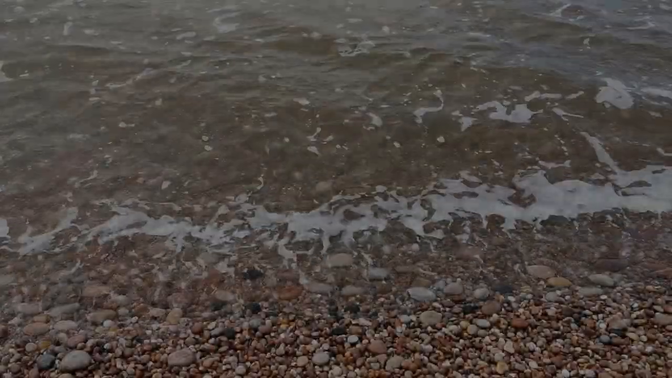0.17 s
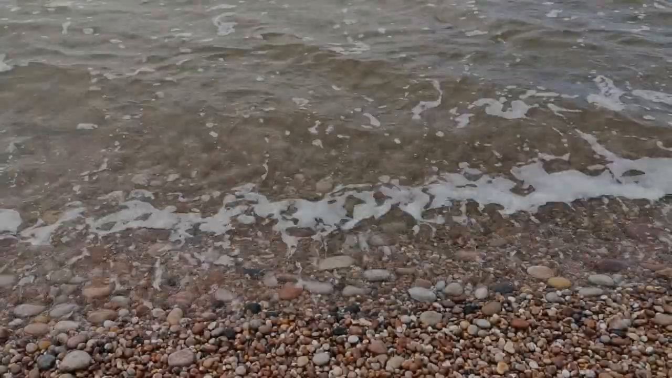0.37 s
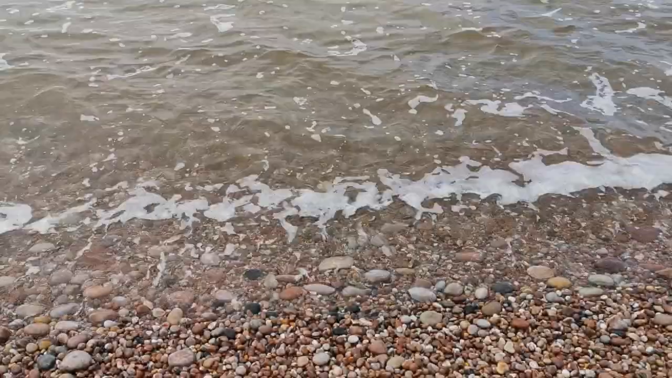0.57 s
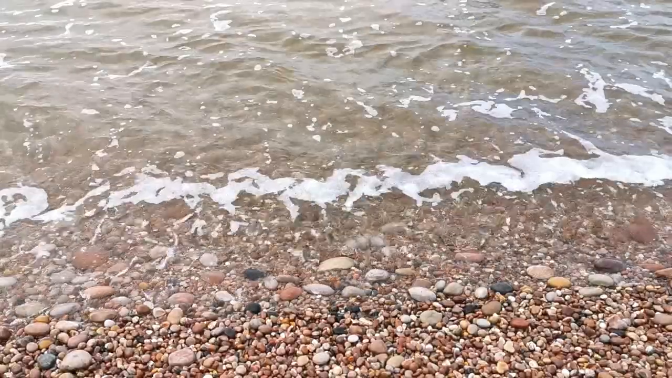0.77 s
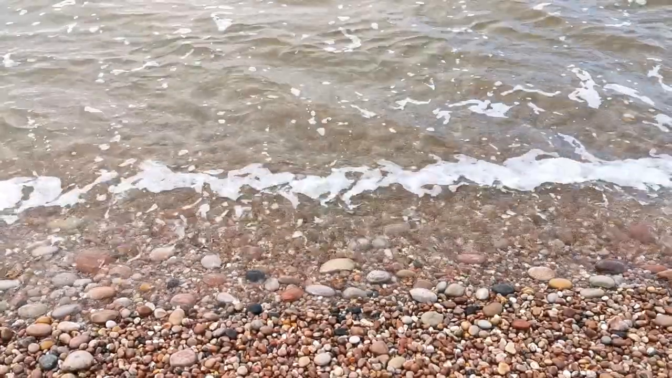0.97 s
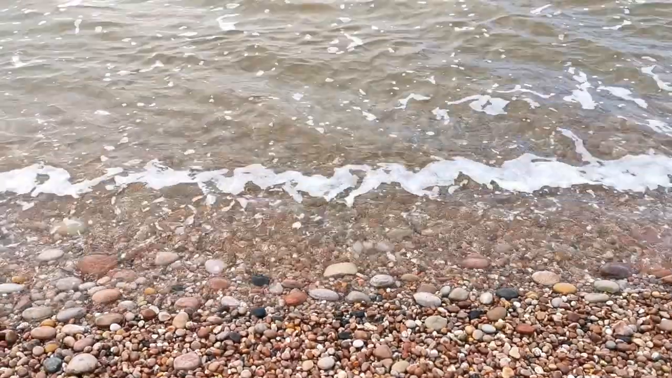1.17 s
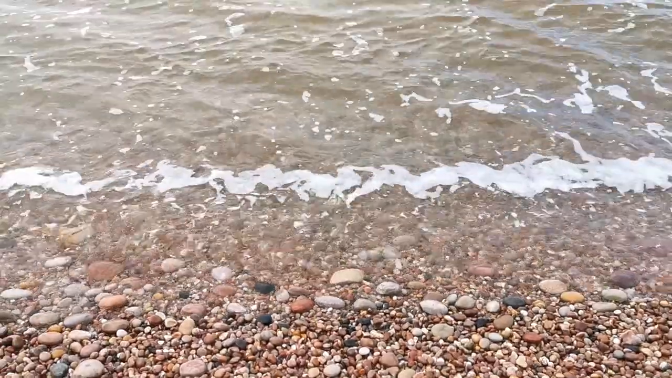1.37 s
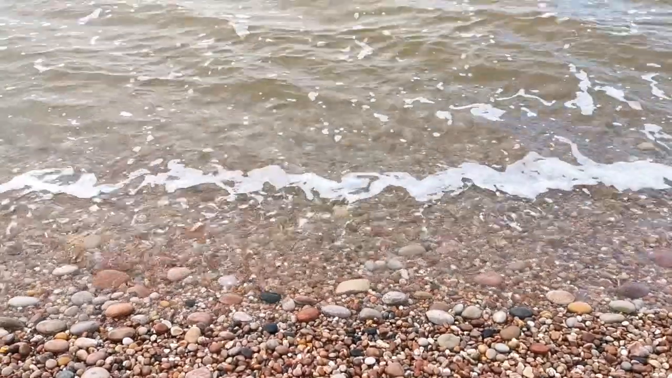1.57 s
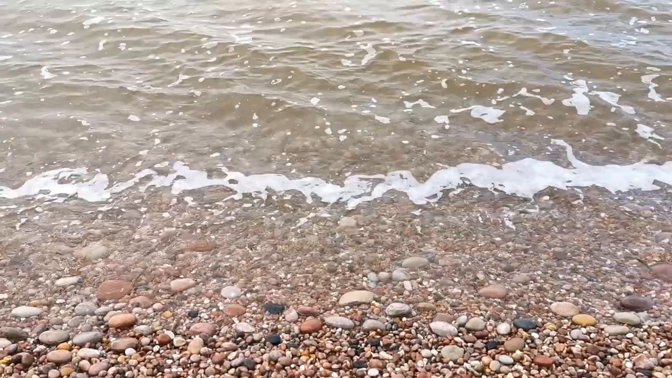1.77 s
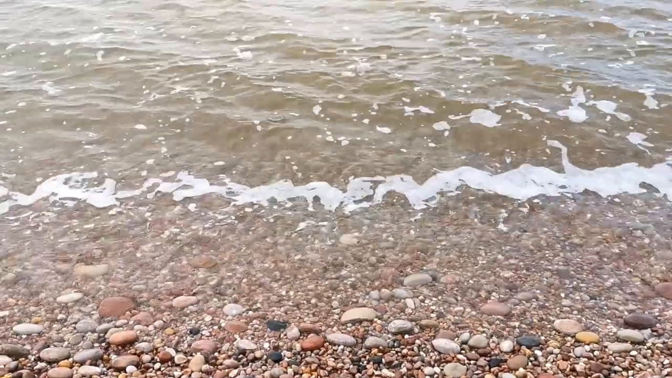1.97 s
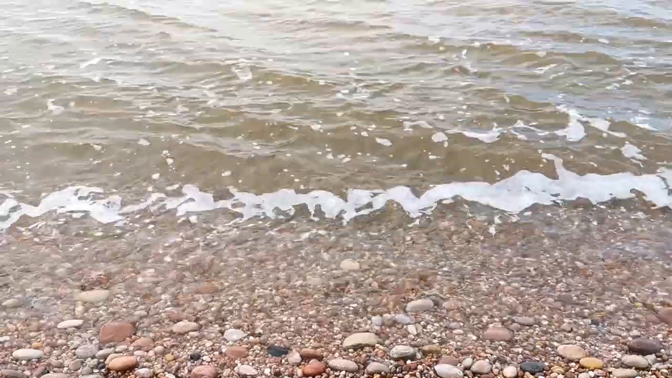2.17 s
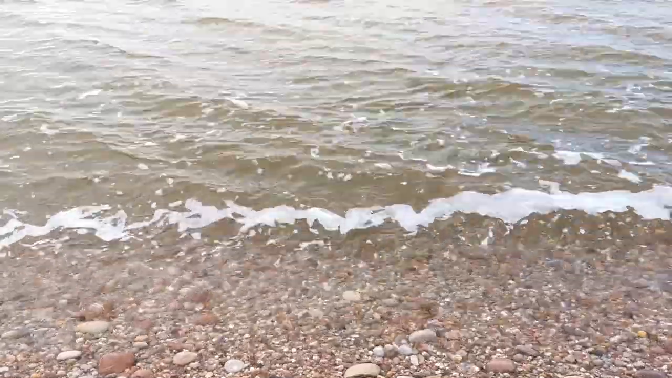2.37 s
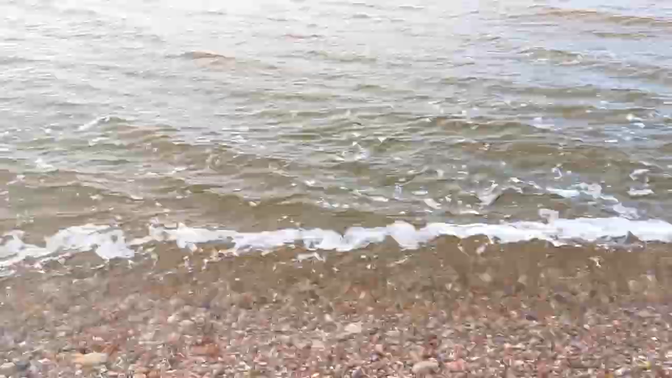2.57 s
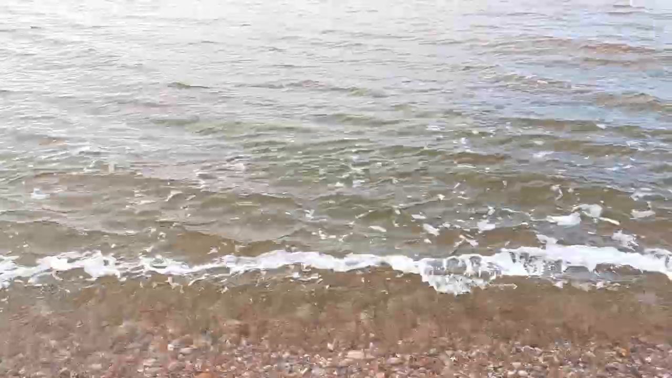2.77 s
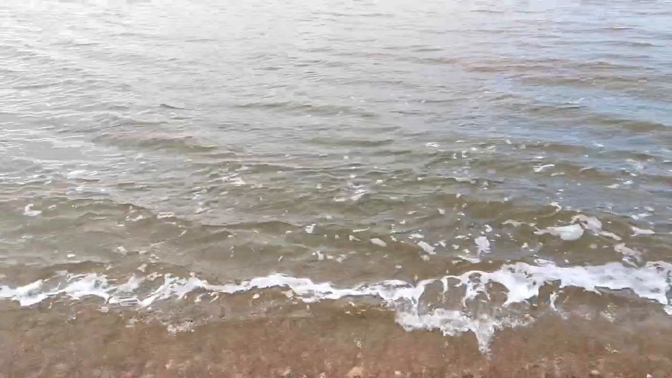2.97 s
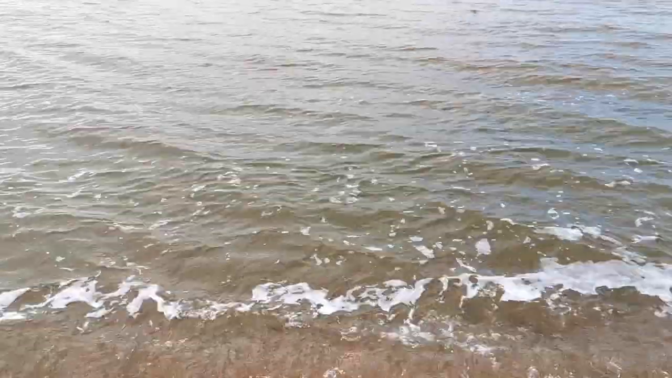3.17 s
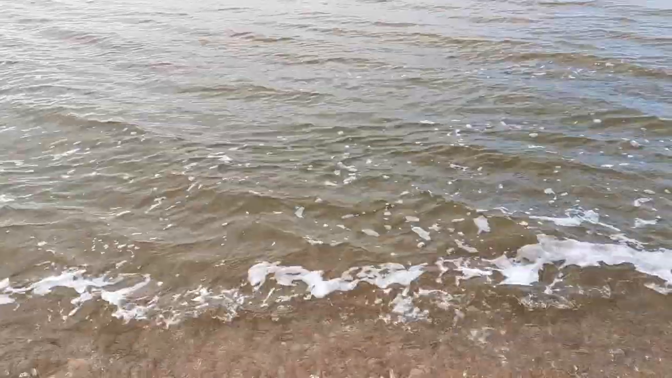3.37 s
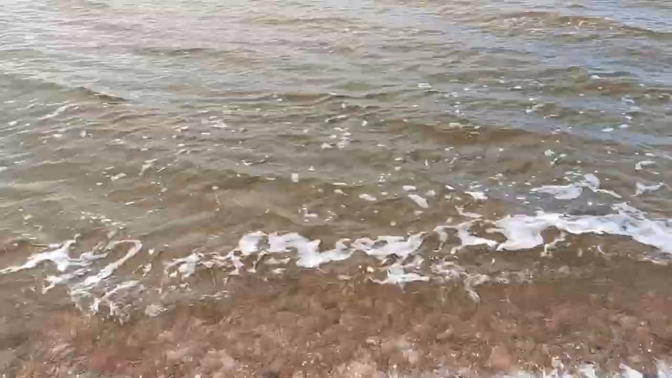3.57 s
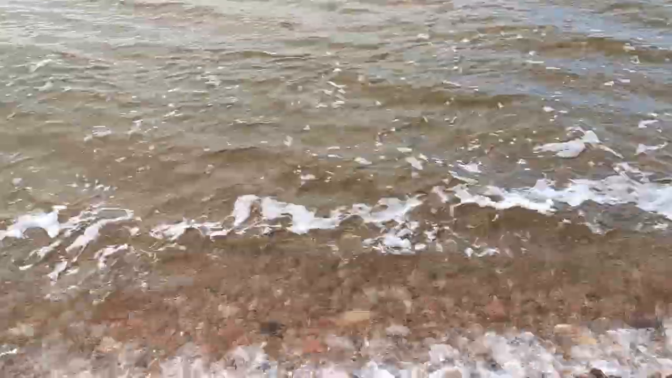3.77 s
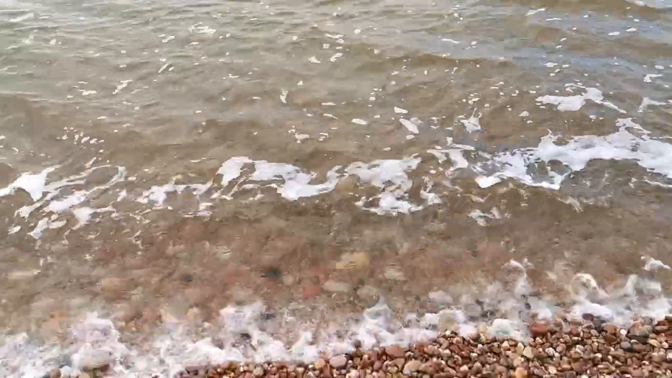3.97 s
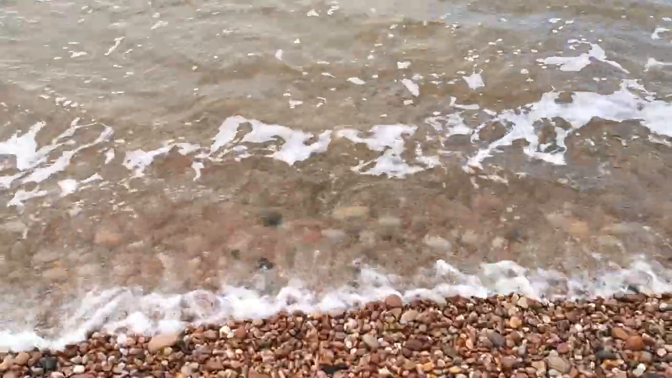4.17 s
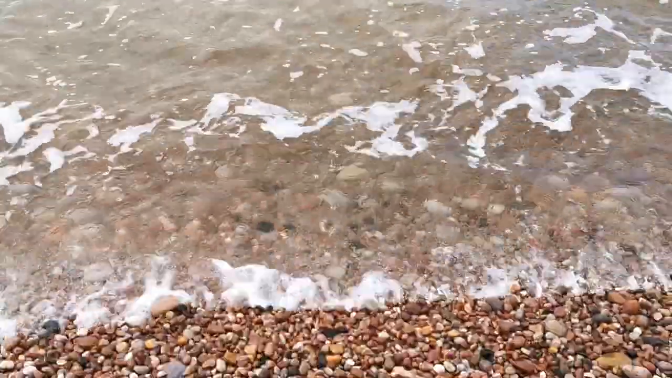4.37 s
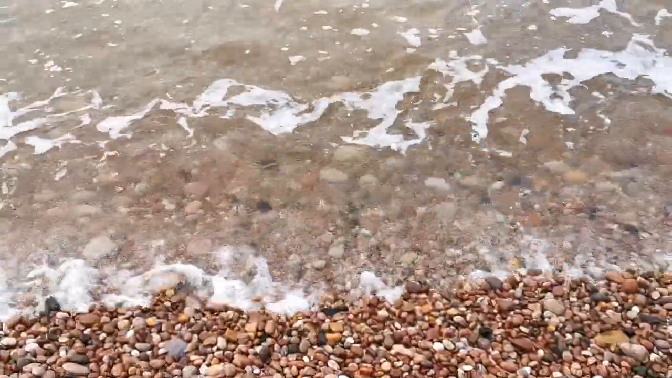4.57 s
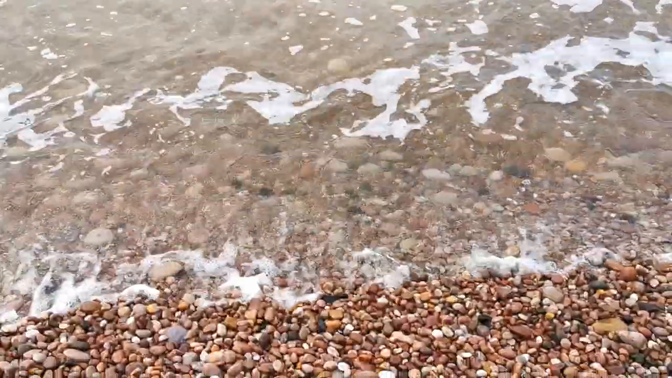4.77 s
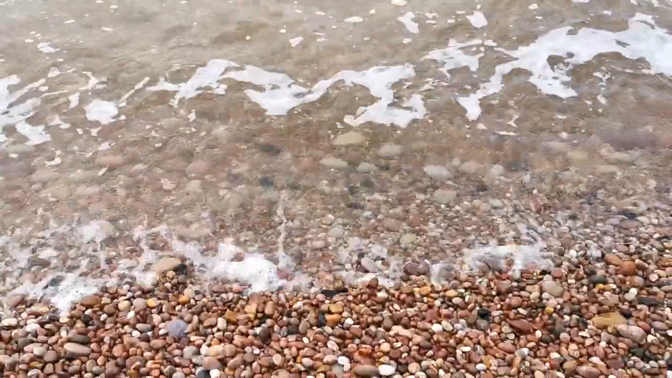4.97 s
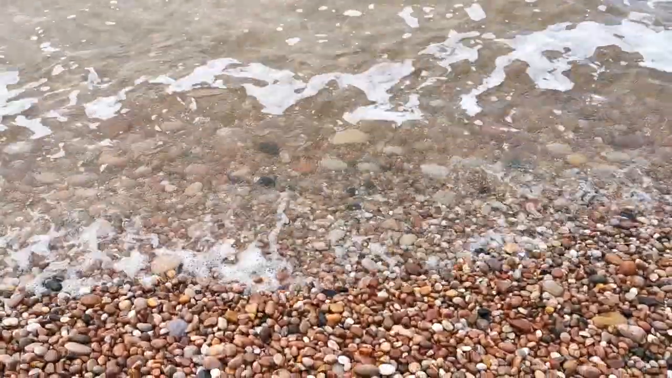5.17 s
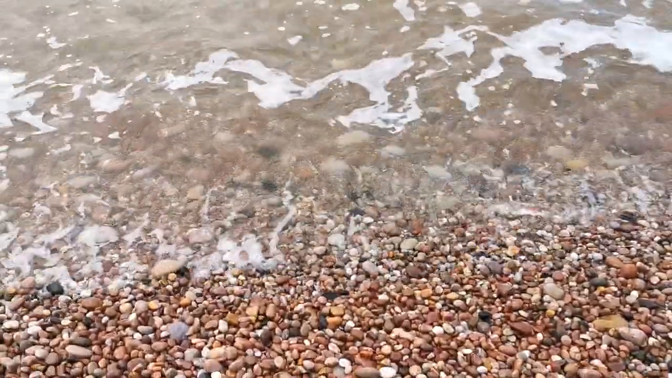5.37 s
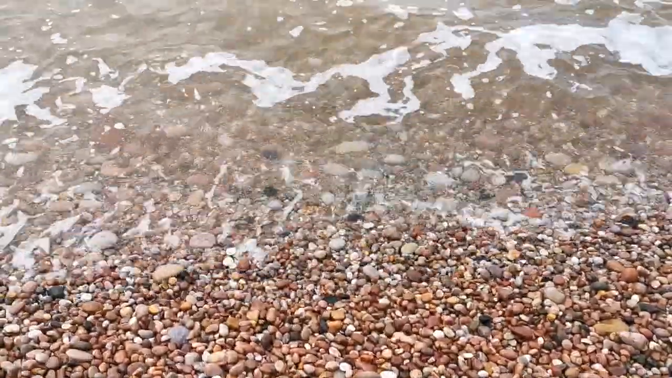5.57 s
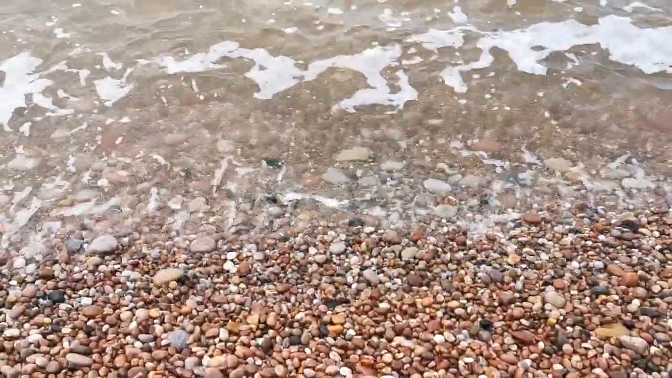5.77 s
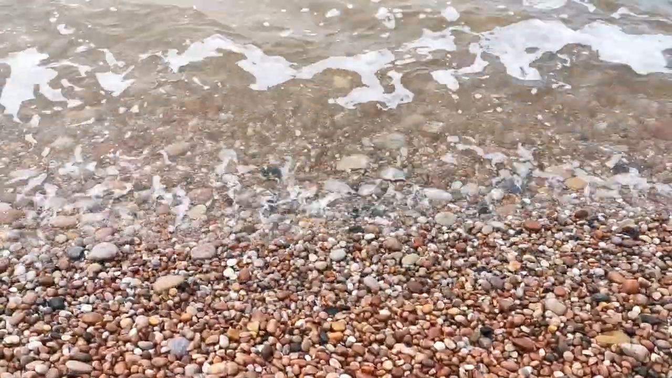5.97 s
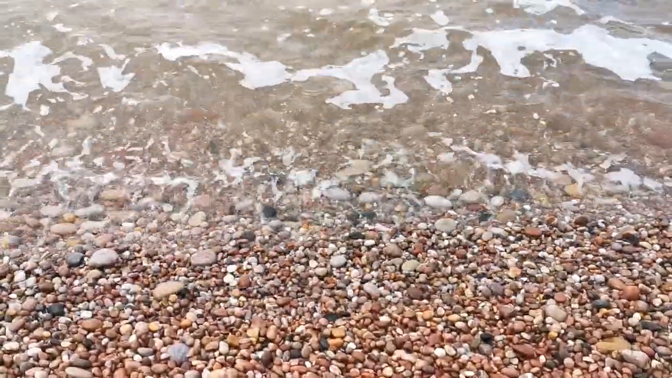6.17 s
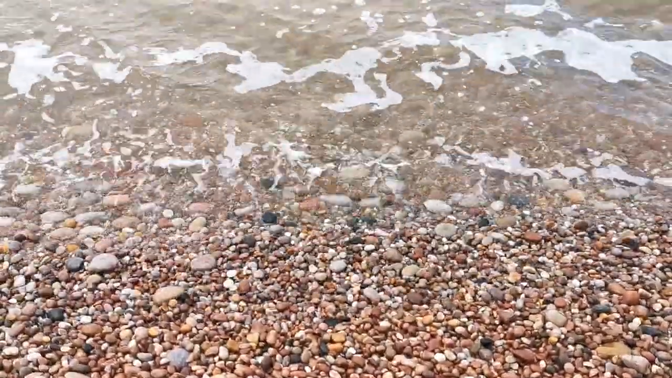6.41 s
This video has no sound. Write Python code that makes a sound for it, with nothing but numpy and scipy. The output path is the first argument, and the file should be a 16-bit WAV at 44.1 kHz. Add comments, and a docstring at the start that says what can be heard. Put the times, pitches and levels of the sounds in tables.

```python
"""A spent wavelet fades on a pebble beach, muffled for half a second; a small lap follows, then a wave plunges,
runs up the shingle and drains back. Two close microphone ports hear it from the water's edge.
Each wash stirs noise and short ringing grains: bubbles, tapping stones and bursting foam. Damped sines make
the single plops, cracks with short rings the pebble knocks, gulps of resonant noise the plunge.
A gusty breeze of low noise buffets the ports, over a faint rumble of far surf."""
import sys
import numpy as np
from scipy import signal
from scipy.fft import rfft, irfft
from scipy.io import wavfile
from scipy.ndimage import uniform_filter1d

SR = 44100
rng = np.random.default_rng(int(sys.argv[2]) if len(sys.argv) > 2 else 0)


def persist_wave(psi):
    """Save psi, clipped to +-1, as 16-bit WAV."""
    counts = np.round(np.clip(psi, -1, 1) * 32767).astype(np.int16)
    wavfile.write(sys.argv[1], SR, np.atleast_2d(counts).T)


N = 283986
TIME, BINS = np.arange(N) / SR, np.fft.rfftfreq(N, 1 / SR)  # seconds, Hz

# Colour of each layer, a relative spectrum per Hz: [freq_hz, level_db]
FAR_SURF_COLOUR = [(60, -9), (110, 0), (160, 9.5), (220, 6), (350, -45), (1000, -43)]
BREEZE_COLOUR = [(10, -14), (30, 2), (70, 0), (105, -8), (150, -9.5), (220, -34.5), (600, -50)]
FOAM_COLOUR = [(1500, -10.5), (3000, 2), (4200, 0.5), (5500, 1), (6300, -2), (7200, 1.5), (7750, -1.5),
               (8300, 2.5), (9100, 1), (10000, -4), (10900, -1), (12000, -8), (14000, -9), (15800, -18)]
SHINGLE_COLOUR = [(900, -7), (1450, 5), (1800, 0), (2450, 1), (2900, 3), (3500, -2), (4300, 1), (5200, -1),
                  (7500, 0), (15000, -50)]
SLOSH_COLOUR = [(400, -3.5), (750, 2), (1000, 3), (1250, 2.5), (1650, -4), (2100, 4), (4000, -44)]
CHURN_COLOUR = [(120, -50), (220, 1), (300, -0.5), (420, 4.5), (520, 1.5), (720, 4), (900, 0.5),
                (1200, 1.5), (2500, -34)]
PLUNGE_COLOUR = [(50, -25), (90, -34), (140, 7), (230, -1), (300, 1), (400, -0.5), (800, -36)]

# Treble dulled at the start: [freq_hz, level_db]
MUFFLING = [(1300, -3), (2500, -7), (4500, -8), (8000, -9.5)]
# Tilt between the ports once the sound has opened out: [freq_hz, left_minus_right_db]
PORT_BALANCE = [(200, -1), (700, 2), (1400, 2), (2400, -2), (3700, -5), (5500, -1), (7300, -4), (8150, 6),
                (8450, 19), (10000, 16), (14000, 15), (15500, 23)]
# How alike the noise is at the two ports, limited to 0-1: [freq_hz, likeness_0_to_1]
PORT_LIKENESS = [(100, 1), (350, 0.6), (700, 0.22), (1300, 0.57), (2400, 0), (4500, 0.08), (5900, 0),
                 (6500, 1), (8000, 0.5), (8800, 0), (11000, 0.6), (15000, 0.7)]
# How much later the sound reaches the right port: [freq_hz, delay_s]
PORT_LAG = [(300, 0), (650, .00018), (1000, .00047), (1500, .0004), (2000, .00051), (3000, .00048),
            (5500, .00054)]
LAG_TOP_HZ = 5560  # no lag from here up
EDGE_HZ = 15900  # top of the audible band

# Slow strength of the breeze: [time_s, level_db]
BREEZE_LEVEL = [(0, -59.5), (1.2, -62), (2.6, -66.5), (3.4, -66.5), (4.7, -53), (6.44, -45)]
# Gusts on top of the breeze: [centre_s, level_db]
GUSTS = [(1.02, -46), (1.1, -50), (1.24, -50.5), (1.36, -55), (1.56, -51.5), (1.85, -58), (2.38, -54),
         (3.96, -49), (4.3, -46), (4.58, -45), (4.76, -44), (4.86, -38.5), (5.2, -37.5), (5.48, -44),
         (5.64, -42.5), (5.91, -37), (6.05, -40), (6.27, -40)]
GUST_HALF_S = 0.03  # from the peak down to 1/e

# Washes of water that swell, hold and fade; the levels are those of each layer before its trim, the times
# before its inertia and linger. In order: spent wavelet, small lap, lift before the breaker, breaker, run up
# the stones, stones tumbling at the top, gurgling soak, trickle between the stones, backwash dragging pebbles.
# [start_s, rise_s, hold_s, fade_db_per_s, churn_db, slosh_db, shingle_db, foam_db]
WASHES = [(-0.3, 0.28, 0.037, 15.5, -58.5, -57, -60, -65),
          (0.511, 0.32, 0.14, 49.5, -57, -63.5, -58.5, -79.5),
          (2.432, 0.9, 0.19, 32, -62.5, -59.5, -51.5, -56.5),
          (3.249, 0.37, 0.07, 20.5, -38.5, -42, -35.5, -32.5), (3.86, 0.46, .06, 58, -44, -45.5, -41, -40),
          (4.333, .1, .04, 89, -49, -57, -43.5, -48), (4.599, 0.19, .23, 56, -47, -57, -57.5, -57),
          (5.105, .3, 0.29, 29.5, -63, -63, -59.5, -62.5), (5.552, 0.41, 0.032, 35, -73, -64.5, -45, -61.5)]
# The breaker throws up single grains, deep swash over the stones mutes them: [time_s, level_db]
GRAIN_COVER = [(0, 0), (3.3, 0), (3.6, 2), (4.4, 0), (4.7, -4), (5.15, -4), (5.3, 0), (6.44, 0)]
# Level of the grains against the noise of the same layer, before the cover (dB)
PLUNGE_GRAINS_DB, SWASH_GRAINS_DB, TAPS_DB, TICKS_DB = -3, -10.5, -7.5, -4

# Large single bubbles, by starting pitch; the row at 0.321 s is instead the low body of the pebble knock there:
# [start_s, level_db, pitch_hz]
PLOPS = [(.261, -41.5, 3420), (.321, -31.5, 534), (.533, -47, 3440), (1.608, -45.5, 5270),
         (1.95, -45.5, 2090), (2.763, -43, 1330), (2.77, -46.5, 1880), (2.94, -40, 860), (3.008, -43, 750),
         (3.238, -49, 4060), (3.153, -45.5, 3530), (3.326, -31, 890), (3.347, -30.5, 298),
         (3.359, -30, 1890), (3.435, -28, 337), (3.535, -30, 134), (3.59, -25, 229), (3.598, -21.5, 720),
         (3.767, -19.5, 298), (4.645, -35.5, 470), (4.82, -33.5, 163), (4.83, -37, 470), (4.985, -37, 536),
         (5.05, -34, 640), (5.439, -40.5, 1740), (5.681, -39, 1460)]
PLOP_T60_S, PLOP_SIZE_LAW = .033, 0.24  # ring time at 1 kHz; larger, lower bubbles ring longer

# Single pebbles knocking, first bounce: [start_s, crack_db, ring_db, ring_hz, left_minus_right_db]
KNOCKS = [(0.209, -39, -33, 2350, -16), (.317, -34, -37, 2450, 2), (.322, -31, -31, 1980, -6),
          (.975, -46, -41, 2350, -3), (1.607, -42, -80, 2686, -7), (2.013, -49, -39, 3800, -3),
          (2.843, -42, -53.5, 7000, 10), (5.288, -34, -32, 7100, -2.5), (5.37, -28.5, -39.5, 2440, -5),
          (5.483, -39, -47, 2450, 6), (5.515, -32, -38, 1900, -2), (5.584, -32, -47, 2500, 1),
          (5.677, -28, -38, 6700, -3), (5.687, -36, -35, 5900, -7), (5.707, -38, -32, 5950, 1),
          (5.73, -33, -47, 2250, 1), (6.193, -32, -36, 2700, -1), (6.365, -28, -42, 2570, -6)]
# What a knocked pebble rings with: [multiple_of_ring_hz, level_db]
STONE_MODES = [(1, -1.5), (1.22, -10)]
BOUNCE_GAP_S, BOUNCE_DROP_DB = .018, -7  # from one bounce to the next

# Ring of the rolling stones, set by their size: [time_s, pitch_hz]
STONE_RING = [(0, 2450), (2.9, 2196), (3.302, 2060), (3.698, 1900), (3.95, 2390), (4.4, 2270), (5.8, 2224),
              (6.3, 2570)]
# Ring of the swash, lower where deeper water holds larger bubbles: [time_s, pitch_hz]
BUBBLE_RING = [(0, 770), (.9, 486), (2.8, 600), (3.7, 774), (4.3, 684), (4.85, 463), (6.44, 598)]
# Ring of the trapped air pocket as it grows, then breaks up: [time_s, pitch_hz]
POCKET_RING = [(3.33, 333), (3.43, 300), (3.5, 233), (3.56, 163), (3.62, 190), (3.7, 252), (3.8, 256),
               (4, 296), (5, 245.5)]
# Gulps of air taken by the breaker, before the plunge trim: [centre_s, level_db]
GULPS = [(3.47, -38.5), (3.58, -38), (3.68, -43.5), (3.78, -40), (4.06, -44)]
GULP_HALF_S = 0.041  # from the peak down to 1/e


def gain_of(db):
    """Decibels to amplitude."""
    return 10 ** (np.asarray(db) / 20)


def evened(x):
    """Scales to rms 1."""
    return x / np.sqrt(np.mean(x ** 2) + 1e-20)


def read(points, hz):
    """Reads a table on a log-frequency axis."""
    freq_hz, value = np.transpose(points)
    return np.interp(np.log(hz + 1), np.log(freq_hz + 1), value)


def follow(curve):
    """Draws a time curve out to one value per sample."""
    return np.interp(TIME, *np.transpose(curve))


def level(curve):
    """Turns a dB curve into a gain per sample."""
    return gain_of(follow(curve))


def filtered(x, gain):
    """Applies a gain, real or complex, to every frequency bin."""
    return irfft(rfft(x) * gain, N)


def coloured(x, spectrum):
    """Filters by a spectrum table, to rms 1."""
    return evened(filtered(x, gain_of(read(spectrum, BINS))))


def add(mix, start_s, sound):
    """Mixes a stereo sound in at its start time."""
    part = mix[:, max(round(start_s * SR), 0):][:, :sound.shape[1]]
    part += sound[:, :part.shape[1]]


def flicker(top_hz):
    """Slow random drift of rms 1, moving up to about top_hz times a second."""
    return evened(filtered(rng.standard_normal(N), np.exp(-(BINS / top_hz) ** 2)))


def puffs(events, half_s):
    """A short bell-shaped swell of gain for each event."""
    return sum(gain_of(db) * np.exp(-((TIME - centre_s) / half_s) ** 2) for centre_s, db in events)


def ring(hz, t60, rise=0.):
    """A damped sine; a bubble's pitch rises as it nears the surface."""
    t = np.arange(int(t60 * SR) + 8) / SR
    tone = np.sin(2 * np.pi * hz * t * (1 + rise * t / t60))
    return tone * np.exp(-np.log(1000) * t / t60)


def resonate(x, curve, width_hz):
    """A resonance of gain 1 at its peak, following a pitch curve."""
    turn = np.exp(2j * np.pi * np.cumsum(follow(curve)) / SR)
    r = np.exp(-np.pi * width_hz / SR)
    # shift the moving pitch down to 0 Hz, smooth there, shift back
    smooth = signal.lfilter([1 - r], [1, -r], x / turn)
    return 2 * (turn * smooth).real


def wash(patchy_db):
    """Countless far grains merge into noise that swells in short patches of time and pitch."""
    frames, hz = N // 128 + 5, np.fft.rfftfreq(512, 1 / SR)
    a, b, c, d, patches = rng.standard_normal((5, frames, len(hz)))
    patches = uniform_filter1d(patches, size=7, axis=0)
    patches = evened(uniform_filter1d(patches, size=7, axis=1))
    same = np.clip(read(PORT_LIKENESS, hz), 0, 1)
    left = a + 1j * b
    right = same * left + np.sqrt(1 - same ** 2) * (c + 1j * d)
    frames_lr = np.array([left, right]) * gain_of(patchy_db * patches)
    noise = signal.istft(frames_lr.transpose(0, 2, 1), nperseg=512, noverlap=384)[1]
    return evened(noise[:, :N])


def grains(low_hz, high_hz, per_s, cycles, spread_db, rise=0., count=42):
    """Near grains of many pitches, each pitch from its own direction; most are small, a few large."""
    out = np.zeros((2, N))
    for hz in np.geomspace(low_hz, high_hz, count):
        at = np.flatnonzero(rng.random(N) < per_s / count / SR)
        size_db = spread_db * np.minimum(rng.exponential(1, N)[at], 3.5)
        train = np.zeros(N)
        train[at] = gain_of(size_db) * (-1) ** at
        grain = ring(hz * rng.uniform(.99, 1.01), cycles / hz, rise) * hz
        sound = signal.oaconvolve(train, grain)[:N]
        # direction: a few samples between the ports, and opposite dB on each side
        skew, side_db = rng.standard_normal(2)
        out += np.array([np.roll(sound, int(skew * 3)), sound]) * gain_of([[side_db], [-side_db]])
    return evened(out / np.sqrt(per_s))  # a higher rate makes the patter denser, not louder


def crowding(flow, calm_per_s):
    """Stronger flow sets off more grains a second."""
    return calm_per_s * np.maximum(flow / np.median(flow), .5) ** 1.3


def stirred(layer, rest_db, inertia, linger):
    """Gain of one layer under all washes; inertia slows its rise, linger its fade."""
    index = ["churn", "slosh", "shingle", "foam"].index(layer)
    power = gain_of(rest_db) ** 2
    for start_s, rise_s, hold_s, fade_db_per_s, *layer_db in WASHES:
        t = TIME - start_s
        swell = np.sin(np.pi / 2 * np.clip(t / (inertia * rise_s), 0, 1)) ** 2
        fading_s = np.maximum(t - inertia * (rise_s + hold_s), 0)
        fade_db = fade_db_per_s / linger * fading_s
        power = power + (swell * gain_of(layer_db[index] - fade_db)) ** 2
    return np.sqrt(power)


def far_surf():
    """A faint steady rumble of low noise from further along the coast."""
    return gain_of(-72.0) * coloured(rng.standard_normal((2, N)), FAR_SURF_COLOUR)


def breeze():
    """Lumpy low turbulence, separate at each port, freshens and gusts."""
    eddies = coloured(rng.standard_normal((2, N)), BREEZE_COLOUR) * gain_of(1.4 * flicker(23))
    strength = np.hypot(level(BREEZE_LEVEL), puffs(GUSTS, GUST_HALF_S))
    return strength * evened(eddies) * gain_of([[1], [-1]])  # left 2 dB above right


def foam(flutter_db=0.94):
    """Tiny bubbles burst in sharp ticks and in clumps, over a fine hiss; the breaker adds spray on top."""
    flow = stirred("foam", rest_db=-56.0, inertia=0.93, linger=1.0)
    ticks = grains(4500, 13000, per_s=crowding(flow, 700), cycles=5, spread_db=5.1)
    hiss = wash(patchy_db=1.5)
    fizz = coloured(hiss + gain_of(TICKS_DB) * level(GRAIN_COVER) * ticks, FOAM_COLOUR)
    fluttering = fizz * gain_of(flutter_db * flicker(32))
    high_pass = signal.butter(2, 11500, "high", fs=SR, output="sos")
    spray = signal.sosfilt(high_pass, wash(patchy_db=1.5))
    spray_gain = gain_of(-13.0) * flow / flow.max()  # strong flow throws up far more spray
    return gain_of(-3.0) * flow * (fluttering + spray_gain * spray)


def plops():
    """Single large bubbles pinch off and ring, their pitch rising; one such ring gives a pebble knock its low
    body."""
    out = np.zeros((2, N))
    for start_s, db, hz in PLOPS:
        t60 = PLOP_T60_S * (10 ** 3 / hz) ** PLOP_SIZE_LAW
        note = ring(hz, t60, rise=0.076)
        swell = 1 - np.exp(-np.arange(len(note)) / SR * hz)  # builds up over about a cycle
        add(out, start_s, gain_of(db) * note * swell * np.ones((2, 1)))
    return out


def knocks(crack_s=0.000965, scatter_s=0.0068, scatter_db=-23, ring_cycles=18, count=3):
    """Each bounce is a gritty contact crack and a brief ring of a few modes, then scatter from the stones around."""
    out, t = np.zeros((2, N)), np.arange(1800) / SR
    band = signal.butter(2, [1500, 8500], "band", fs=SR, output="sos")
    for start_s, crack_db, ring_db, hz, pan_db in KNOCKS:
        for bounce in range(count):
            hit_s = start_s + bounce * BOUNCE_GAP_S
            size = gain_of(BOUNCE_DROP_DB * bounce + np.array([[pan_db], [-pan_db]]) / 2)
            crack = rng.standard_normal(len(t)) * t / crack_s * np.exp(-t / crack_s)
            scatter = gain_of(scatter_db) * rng.standard_normal((2, len(t))) * np.exp(-t / scatter_s)
            add(out, hit_s, size * gain_of(crack_db) * signal.sosfilt(band, crack + scatter))
            for ratio, mode_db in STONE_MODES:
                mode = ring(hz * ratio, ring_cycles / hz)
                add(out, hit_s + crack_s, size * gain_of(ring_db + mode_db) * mode)
    return out


def shingle():
    """Wet stones, slow to start and to settle, roll and tap one another; most ring near one pitch."""
    flow = stirred("shingle", rest_db=-61.0, inertia=1.324, linger=1.5)
    taps = grains(1400, 6000, per_s=crowding(flow, 400), cycles=22, spread_db=4.4)
    stones = wash(patchy_db=1.7) + gain_of(TAPS_DB) * level(GRAIN_COVER) * taps
    ringing = stones + gain_of(10) * resonate(stones, STONE_RING, width_hz=730)
    return gain_of(-1.22) * flow * coloured(ringing, SHINGLE_COLOUR)


def water(churn):
    """Bubble clouds: middling ones in the swash, gathered round one pitch, and small ones along the shore."""
    slosh = stirred("slosh", rest_db=-70, inertia=1.15, linger=1.35)
    near = gain_of(SWASH_GRAINS_DB) * level(GRAIN_COVER)
    middle_grains = grains(260, 1000, crowding(churn, 350), cycles=16, spread_db=3, rise=.1, count=30)
    middle = wash(patchy_db=1.3) + near * middle_grains
    small_grains = grains(800, 1800, crowding(slosh, 350), cycles=18, spread_db=3, rise=.1, count=24)
    small = wash(patchy_db=1.3) + near * small_grains
    gurgle = middle + gain_of(-2.0) * resonate(middle, BUBBLE_RING, width_hz=270)
    return (gain_of(-0.92) * churn * coloured(gurgle, CHURN_COLOUR)
            + gain_of(2.26) * slosh * coloured(small, SLOSH_COLOUR))


def plunge(churn):
    """The breaker gulps air, booming lower as the pocket grows; churning water keeps it rumbling."""
    deep_grains = grains(110, 380, per_s=240, cycles=16, spread_db=2, rise=.1, count=20)
    cloud = wash(patchy_db=2) + gain_of(PLUNGE_GRAINS_DB) * deep_grains
    boom = evened(resonate(cloud, POCKET_RING, width_hz=187)) + gain_of(-29) * cloud
    air = np.hypot(puffs(GULPS, GULP_HALF_S), gain_of(-8.5) * churn)
    return gain_of(-1.5) * air * coloured(boom, PLUNGE_COLOUR)


def scene():
    """The shore, and the breeze right at the ports."""
    churn = stirred("churn", rest_db=-64, inertia=1.05, linger=1.55)
    background = far_surf() + breeze()
    details = foam() + plops() + knocks()
    return background + details + shingle() + water(churn) + plunge(churn)


def lagged(pair):
    """Delays the right port by the extra path from the sea."""
    delay_s = read(PORT_LAG, BINS) * (BINS < LAG_TOP_HZ)
    return np.array([pair[0], filtered(pair[1], np.exp(-2j * np.pi * BINS * delay_s))])


def record(dry):
    """Starts muffled, with no lag or tilt between the ports, then opens out with the treble leaning left."""
    lean_db = read(PORT_BALANCE, BINS) / 2
    leaning = filtered(lagged(dry), gain_of([lean_db, -lean_db]))
    muffled = filtered(dry, gain_of(read(MUFFLING, BINS)))
    share = np.interp(TIME, [.53, .82], [0, 1])  # crossfade, seconds
    heard = share * leaning + (1 - share) * muffled
    low_pass = signal.firwin(511, EDGE_HZ, window=("kaiser", 9), fs=SR)
    return signal.oaconvolve(heard, low_pass[None], "same")


dry = scene()
out = record(dry)
persist_wave(out)
```